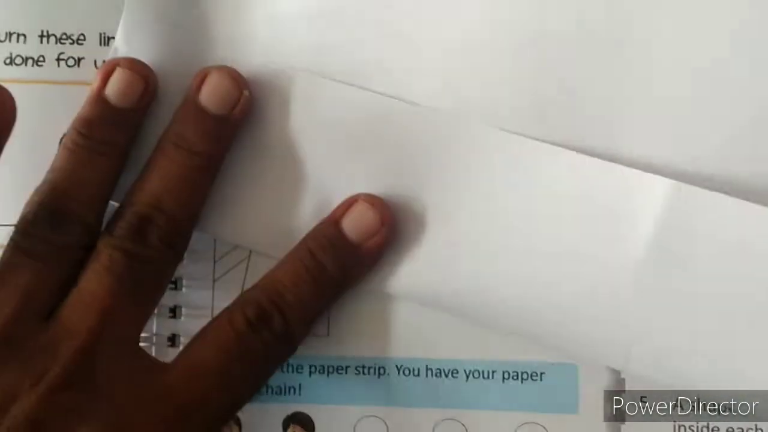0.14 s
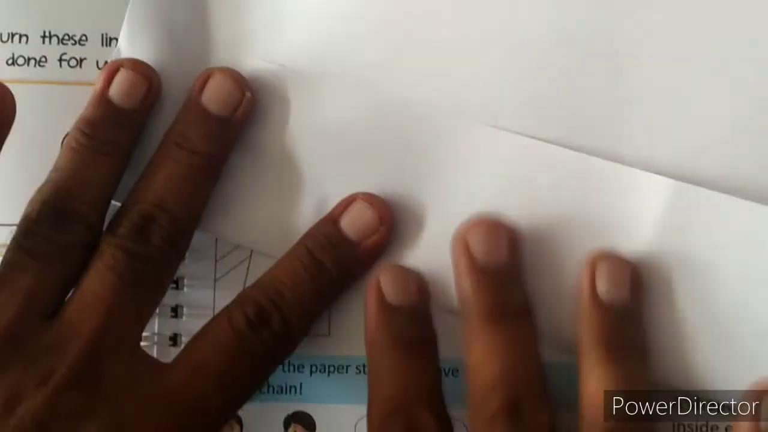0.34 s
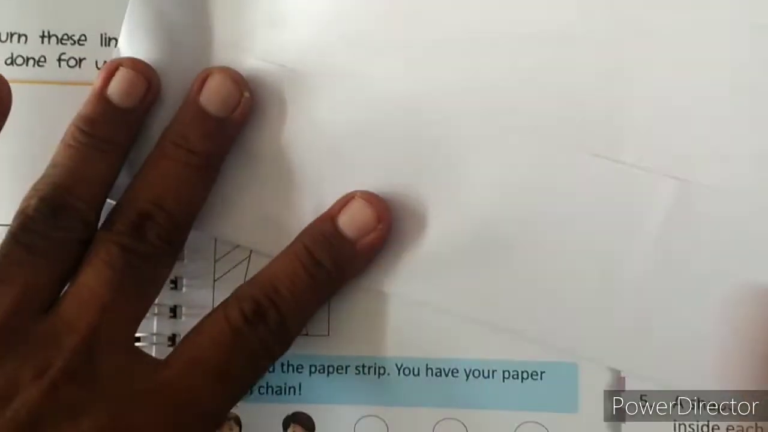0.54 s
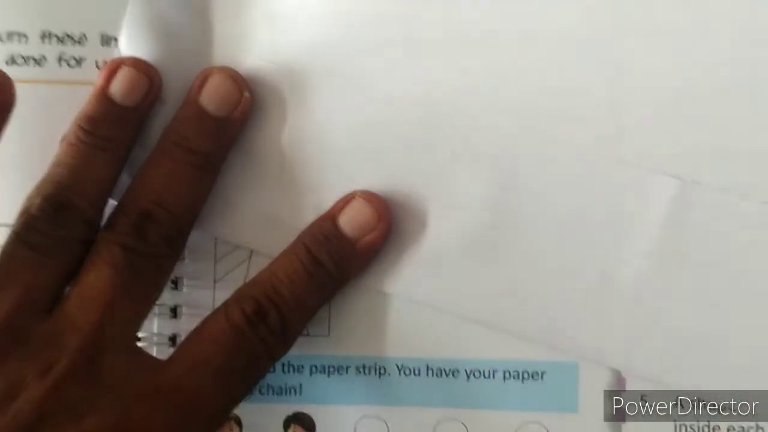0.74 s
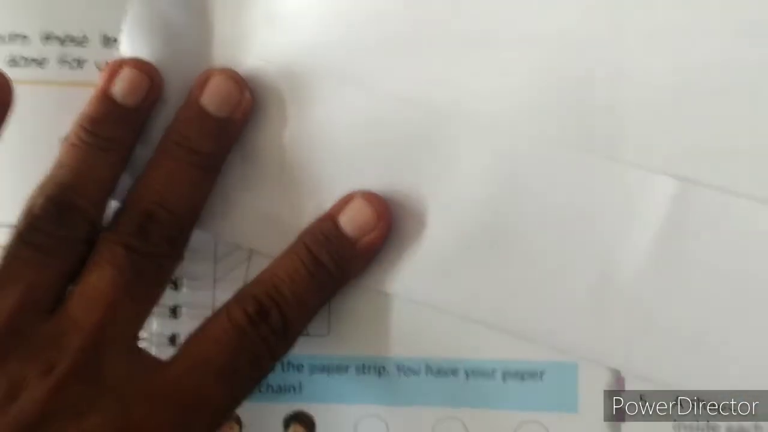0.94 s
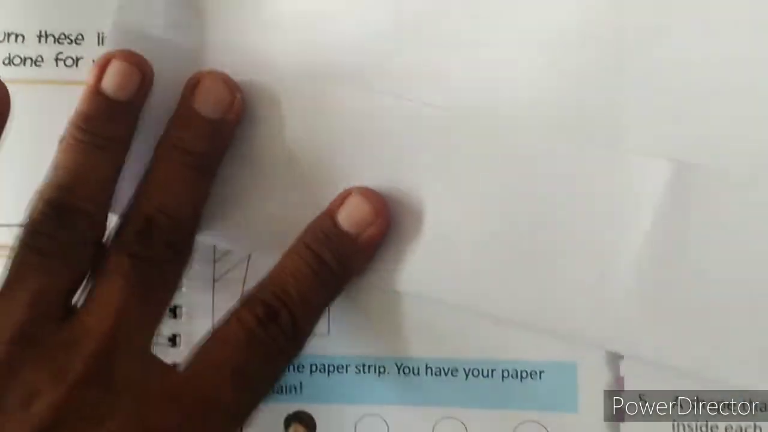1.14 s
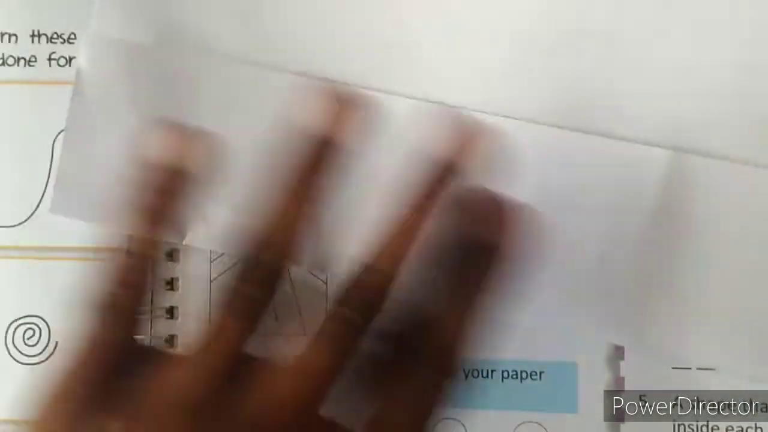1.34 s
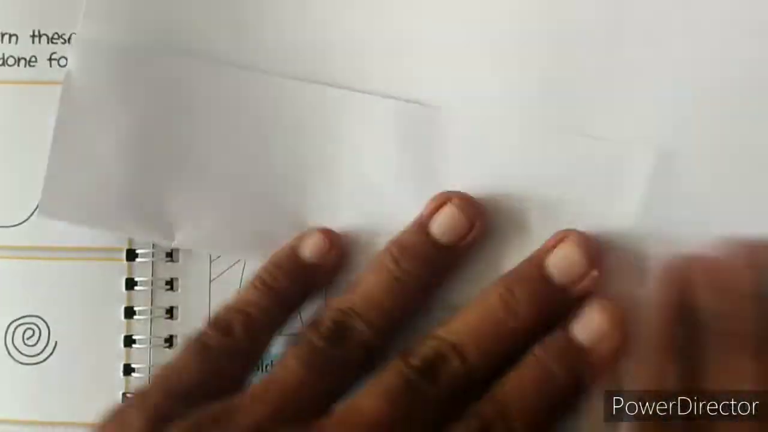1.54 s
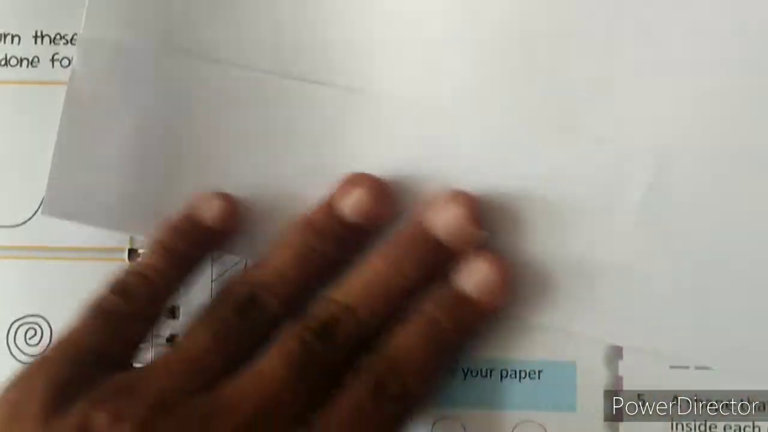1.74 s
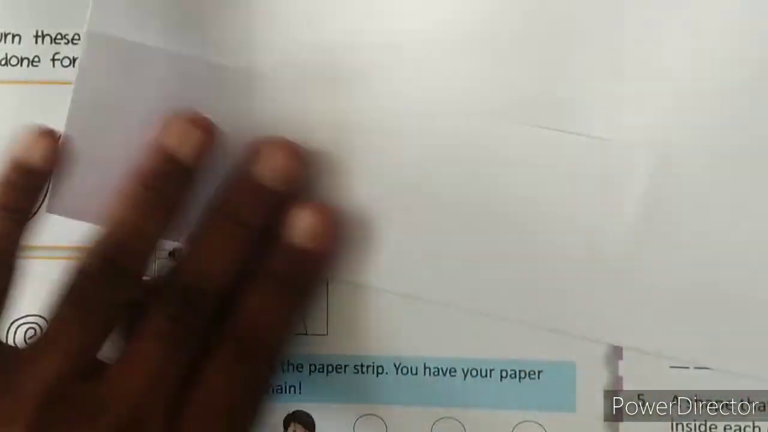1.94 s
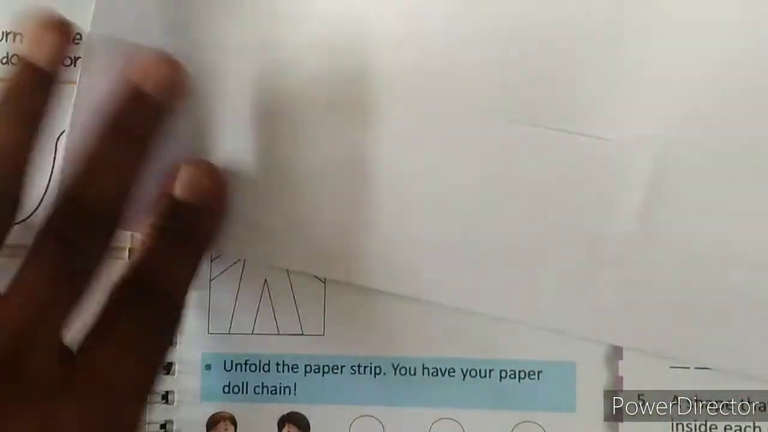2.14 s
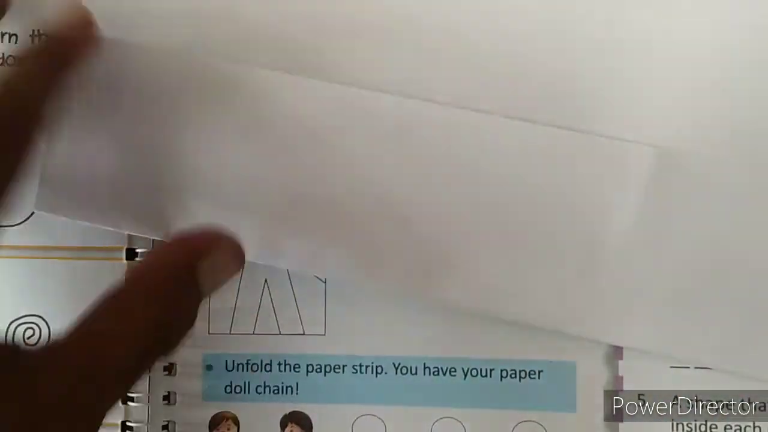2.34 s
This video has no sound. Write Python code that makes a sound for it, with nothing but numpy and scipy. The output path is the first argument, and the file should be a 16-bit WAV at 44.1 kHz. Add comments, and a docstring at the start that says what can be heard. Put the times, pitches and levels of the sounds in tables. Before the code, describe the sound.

Hands press and slide along folded paper on a desk, hissing, crackling and softly thumping indoors

```python
"""Fingertips smooth a paper strip on a desk under a phone on a stand. Skin slides on paper (a bright hiss) and
paper slides on paper (a duller scrape), both made of patchy noise, and the dragging rumbles in the desk.
Creases snap as short bursts of noise, and a small room answers them. Fingers tap the desk, whose low knock,
a sum of fading tones, climbs the stand into the left microphone. Soft room tone lies underneath."""
import sys
import numpy as np
from scipy import signal
from scipy.fft import rfft, irfft, next_fast_len
from scipy.io import wavfile
from scipy.ndimage import uniform_filter1d, map_coordinates

SR = 44100
rng = np.random.default_rng(int(sys.argv[2]) if len(sys.argv) > 2 else 0)


def master(y):
    """Save y as 16-bit WAV."""
    cut = np.clip(np.atleast_2d(y).T, -1, 1)
    pcm = np.round(cut * 32767)  # scale
    wavfile.write(sys.argv[1], SR, pcm.astype(np.int16))


N = 110250  # length in samples: 2.5 seconds

# Room tone. Each row: frequency in Hz, relative strength per Hz in dB.
AIR_COLOUR = [(20, -29), (42, -3), (60, 4), (120, 9.5), (300, 2), (1000, -32), (4000, -12.5), (14000, -29)]
AIR_DB, AIR_LEFT_DB = -61.5, 15.5  # level; left over right

# How long the room rings. Each row: frequency in Hz, time to fade by 60 dB in seconds.
ROOM_FADE = [(300, 0.13), (2000, 0.43), (10000, 0.22)]
ROOM_DB, ROOM_DELAY_S = -5.5, 0.0033

# Tones the desk rings with. Each row: frequency in Hz, left level in dB, right level in dB,
# time to fade by 60 dB in seconds.
DESK_MODES = [(154, -25, -43, 0.2), (229, -6, -42, 0.075), (187, -4, -29, 0.16), (239.5, -8.5, -39, 0.23),
              (275.3, -7.5, -28.5, 0.16), (269.3, -2, -38, 0.086), (306.8, 0.5, -31, 0.17),
              (339.7, -14, -37, 0.27), (417.2, -8, -23, 0.15), (447, -16.5, -47, 0.29),
              (511, -29.5, -16, 0.02), (600, -17, -23, 0.076), (688.6, -10.5, -48, 0.14),
              (748, -9, -17, 0.074), (1079, -5.5, -21, 0.018)]
SWELL_CYCLES = 0.06  # time constant of a mode's build-up
MODE_SCATTER_DB, DETUNE = 3.5, 0.015  # each landing favours other modes; a resting hand shifts them (share)
WAVER_CYCLES, WAVER_PER_S = 0.07, 30  # pressing hands blur the ring: size and speed of the phase drift
STAND_HZ, STAND_ORDER = 106.5, 4  # the stand holds back slower shaking

# Finger taps. Each row: start in seconds, strength of the push in dB, contact time in seconds.
FINGER_TAPS = [(0.2247, -22, 0.0015), (0.337, -28, 0.00099), (0.3553, -21.5, 0.0025),
               (0.493, -27.5, 0.0026), (0.661, -22.5, 0.0036), (0.6747, -24.5, 0.0025),
               (0.802, -16.5, 0.011), (0.8466, -16, 0.0018), (0.87, -21, 0.0073), (0.902, -35, 0.0022),
               (0.993, -33.5, 0.00097), (1.002, -6, 0.0098), (1.019, -27, 0.0043), (1.066, -15.5, 0.0015),
               (1.294, -18.5, 0.0024), (1.404, -27, 0.0018), (1.418, -20.5, 0.0037), (1.538, -23, 0.0036),
               (1.689, -26.5, 0.00077), (1.71, -28.5, 0.0017), (1.7293, -23.5, 0.0019),
               (1.7448, -32, 0.0011), (1.894, -40.5, 0.00058), (2.201, -37.5, 0.0012),
               (2.2141, -24.5, 0.0036)]

# Resonances of the paper on the desk, before the response is squared.
# Each row: frequency in Hz, width in Hz, level in dB.
PAPER_RESONANCES = [(474, 287, -3.5), (1018, 260, -1), (1353, 347, -2), (1889, 387, 0.5), (2192, 574, 1),
                    (2612, 663, -1.5), (3300, 870, -6), (4480, 1160, -6.5), (7850, 6400, -14)]

# Crease snaps. Each row: start in seconds, strength in dB before the paper rings, centre frequency in Hz,
# length in seconds, left over right in dB.
CREASE_SNAPS = [(0.0805, -27.5, 1490, 0.0062, -15), (0.179, -31, 2100, 0.0041, -9),
                (0.2165, -28, 1930, 0.0024, -8), (.476, -34, 2950, 0.00079, -23),
                (0.495, -28.5, 5000, 0.0017, -14), (0.5055, -9, 6500, 0.0016, -6),
                (0.517, -24.5, 8500, 0.0019, 12), (0.6917, -32, 3020, 0.016, -14),
                (.929, -35.5, 2600, 0.0015, -12), (1.105, -33.5, 3430, 0.019, -7),
                (1.125, -25, 2580, 0.0086, -12.5), (1.212, -40.5, 1880, 0.042, -18),
                (1.2656, -19.5, 8000, 0.009, -4), (1.2762, -22, 8000, 0.005, 0),
                (1.2687, -20.5, 1860, 0.02, -8.5), (1.634, -39.5, 2950, 0.019, -17),
                (1.651, -33, 3060, 0.0098, -12), (1.658, -28.5, 2880, 0.0096, -8),
                (1.6845, -14, 1570, 0.0051, -15), (1.6894, -19, 660, 0.0074, -9.5),
                (1.713, -32, 1500, 0.0051, 8), (1.72, -35, 1180, 0.0097, -18),
                (2.002, -25.5, 2540, 0.0053, -17.5), (2.0035, -24, 776, 0.0091, 0),
                (2.042, -36, 2500, 0.0096, 7), (2.0264, -29.5, 590, 0.0048, -15),
                (2.0269, -32, 2800, 0.012, 15), (2.167, -33.5, 2960, 0.0065, 2),
                (2.214, -25.5, 9000, 0.0015, -13), (2.234, -28, 10000, 0.0015, 2),
                (2.243, -26.5, 10000, 0.0047, -3), (2.45, -49.5, 1390, 0.004, -25)]
SNAP_WIDTH_OCT, SNAP_RISE_S = 1.02, 0.000081  # spread of the colour in octaves; time constant of the rise
SNAP_FLOOR_HZ = 350  # thin paper radiates little bass
CRACKS_PER_S, CRACK_SPREAD_DB = 1500, 2.5  # a snap is a run of tiny cracks
LEFT_LAG_S = 0.0004  # the left port is farther away
BARE_DB = -7.5  # the snap heard directly, next to the ringing paper

# Sliding over time. Each row: time in seconds, level of the skin hiss in dB, level of the paper scrape in dB,
# level of the desk rumble in dB.
SLIDE_LEVELS = [(0, -41, -58, -51), (.15, -41, -47, -61), (.19, -50.5, -47, -62),
                (0.247, -45, -51.5, -38.5), (.32, -58.5, -56, -54.5), (.46, -69, -62.5, -52),
                (0.5, -42, -43.5, -60), (.55, -43.5, -56.5, -50), (0.679, -39.5, -81, -63.5),
                (.78, -41, -64, -54), (0.842, -49, -58.5, -54), (0.953, -45, -54, -53),
                (1.06, -55, -60, -48), (1.098, -49, -66, -35.5), (1.137, -40, -45.5, -40.5),
                (1.2, -50.5, -45, -47), (1.259, -45, -44.5, -45), (1.297, -39, -41, -29.5),
                (1.35, -47.5, -43, -40.5), (1.42, -54.5, -45.5, -48.5), (1.612, -70, -56, -54),
                (1.645, -43, -47, -74), (1.679, -45.5, -46.5, -45), (1.7, -46.5, -32, -33),
                (1.752, -44.5, -38, -37), (1.8, -43.5, -41, -49), (1.99, -49.5, -46, -52),
                (2.03, -48.5, -43, -57), (2.19, -52, -51.5, -54), (2.24, -49.5, -50.5, -56.5),
                (2.321, -59, -54, -55.5), (2.391, -48.5, -56, -64), (2.5, -64, -59.5, -78.5)]
# Colour of skin on paper. Each row: frequency in Hz, relative strength per Hz in dB.
HISS_COLOUR = [(250, -73), (650, -9.5), (1200, -11.5), (2400, -6.5), (3500, -0.5), (4500, -0.5), (7000, -5),
               (9000, -0.5), (14500, -10.5)]
HISS_LEFT_DB, SCRAPE_LEFT_DB = -0.5, 2  # left over right
GRAINS_PER_S, GRAIN_SPREAD_DB = 540, 5  # fibres that catch and let go
GRAIN_SHARE = 0.14  # their share of the power

# Overall colour of the sound: a dip above 4.7 kHz, a steep drop above 14.3 kHz.
# Each row: frequency in Hz, gain in dB.
OVERALL_COLOUR = [(4500, -0.5), (5000, -6.5), (6500, -2), (8600, 0.5), (10500, -5), (14300, -5),
                  (14700, -37)]
TOP_HZ, EDGE_HZ = 15600, 300  # nothing above the top; the fade below it is this wide


def amp(db):
    """Turn dB into a plain gain."""
    return 10 ** (np.asarray(db) / 20)


def unit(x):
    """Scale each channel to an average (RMS) level of one."""
    return x / np.sqrt(np.mean(x ** 2, axis=-1, keepdims=True) + 1e-20)


def along(points, hz):
    """Read a curve of (Hz, value) points on a log frequency axis."""
    point_hz, values = np.transpose(points)
    return np.interp(np.log(hz + 1), np.log(point_hz + 1), values)


def filtered(x, response):
    """Multiply the spectrum of x by a response that depends on frequency."""
    size = next_fast_len(x.shape[-1] + SR // 2)
    spectrum = rfft(x, size) * response(np.fft.rfftfreq(size, 1 / SR))
    return irfft(spectrum, size)[..., :x.shape[-1]]


def sides(left_db):
    """Gains of both channels for a left-over-right difference."""
    return amp([[left_db / 2], [-left_db / 2]])


def room_tone():
    """Steady coloured noise, much stronger on the left."""
    noise = filtered(rng.standard_normal((2, N)), lambda hz: amp(along(AIR_COLOUR, hz)))
    return amp(AIR_DB) * sides(AIR_LEFT_DB) * unit(noise)


def room(x):
    """Each frequency of the room's answer dies at its own speed."""
    hz, t, z = signal.stft(rng.standard_normal((2, SR)), SR, nperseg=256)
    fade = amp(-60 * t / along(ROOM_FADE, hz)[:, None])
    tail = signal.istft(z * fade, SR, nperseg=256)[1]
    late = np.pad(x.mean(axis=0), (round(ROOM_DELAY_S * SR), 0))
    return signal.fftconvolve(late[None], tail / np.linalg.norm(tail[0]), axes=1)[:, :N]


def desk(push, scatter):
    """A push rings the desk's modes, which reach each port through the stand; scatter 0 keeps them as listed."""
    hz, left_db, right_db, t60 = np.transpose(DESK_MODES)[..., None]
    t = np.arange(SR // 2) / SR
    level_luck, pitch_luck = scatter * rng.standard_normal((2, *hz.shape))

    # a slow random phase for each mode, starting from zero
    drift_points = rng.standard_normal((len(hz), WAVER_PER_S))
    places = np.broadcast_arrays(np.arange(len(hz))[:, None], t * WAVER_PER_S)
    drift = map_coordinates(drift_points, places)
    waver = WAVER_CYCLES * (drift - drift[:, :1]) * np.minimum(t * WAVER_PER_S, 1)
    cycles = hz * (1 + DETUNE * pitch_luck) * t + waver

    fade = amp(MODE_SCATTER_DB * level_luck - 60 * t / t60)
    swell = 1 - np.exp(-hz * t / SWELL_CYCLES)
    rings = fade * swell * np.cos(2 * np.pi * cycles)
    answer = np.array([(amp(db) * rings).sum(axis=0) for db in (left_db, right_db)])
    stand = signal.butter(STAND_ORDER, STAND_HZ, "high", fs=SR, output="sos")
    return signal.fftconvolve(push[None], signal.sosfilt(stand, answer), axes=1)


def taps():
    """Each fingertip is a soft push on the desk; a longer contact knocks duller."""
    out, t = np.zeros((2, N + SR)), np.arange(SR // 50) / SR
    for start, db, contact in FINGER_TAPS:
        push = t ** 2 * np.exp(-6 * t / contact)
        knock = desk(amp(db) * push / push.sum(), scatter=1)
        out[:, round(start * SR):][:, :knock.shape[1]] += knock
    return out[:, :N]


def paper(hz):
    """Causal response of the paper's resonances, with shallow valleys between them."""
    total = 0
    for k, (centre, width, db) in enumerate(PAPER_RESONANCES):
        damping = 1j * hz * width
        # neighbours get opposite signs
        total = total + (-1) ** k * amp(db) * damping / (centre ** 2 - hz ** 2 + damping)
    return total ** 2


def snaps():
    """A crease gives way: a noise burst around its own centre that partly rings the paper."""
    out, t = np.zeros((2, N + SR)), np.arange(SR // 10) / SR
    for start, db, centre_hz, length, left_db in CREASE_SNAPS:
        def colour(hz):
            octaves = np.log2((hz + 1) / centre_hz)
            less_bass = hz ** 2 / (hz ** 2 + SNAP_FLOOR_HZ ** 2)
            return less_bass * np.exp(-0.5 * (octaves / SNAP_WIDTH_OCT) ** 2)

        wobble = map_coordinates(rng.standard_normal(SR // 10), [t * CRACKS_PER_S])
        cracks = amp(CRACK_SPREAD_DB * wobble) * rng.standard_normal((2, len(t)))
        fade = (1 - np.exp(-t / SNAP_RISE_S)) * np.exp(-2 * t / length)
        burst = unit(fade * filtered(cracks, colour))
        # scaling by the fade's own RMS keeps short and long snaps comparable in height
        burst *= np.sqrt(np.mean(fade ** 2)) * amp(db) * sides(left_db)
        out[0, round((start + LEFT_LAG_S) * SR):][:len(t)] += burst[0]
        out[1, round(start * SR):][:len(t)] += burst[1]
    return filtered(out[:, :N], lambda hz: amp(BARE_DB) + paper(hz))


def friction(colour, patchy_db):
    """Patchy noise plus tiny catches of the fibres: shared timing, but separate noise at the two ports."""
    # raise and lower patches of time and frequency at random
    z = signal.stft(rng.standard_normal((2, N)), nperseg=768)[2]
    field = uniform_filter1d(rng.standard_normal(z.shape[1:]), size=3, axis=0)
    field = uniform_filter1d(field, size=5, axis=1)
    noise = signal.istft(z * amp(patchy_db * field / field.std()), nperseg=768)[1][:, :N]

    strength = amp(GRAIN_SPREAD_DB * np.minimum(rng.exponential(size=N), 3))
    catches = (rng.random(N) < GRAINS_PER_S / SR) * strength
    decay = np.exp(-np.arange(SR // 500) / (SR * 0.00035))  # time constant of a catch: 0.35 milliseconds
    grains = np.convolve(catches, decay)[:N] * rng.standard_normal((2, N))
    mix = np.sqrt(1 - GRAIN_SHARE) * unit(noise) + np.sqrt(GRAIN_SHARE) * unit(grains)
    return unit(filtered(mix, colour))


def sliding():
    """Hiss and scrape in the air, and the rumble that dragging fingers send through the desk."""
    times, *levels = np.transpose(SLIDE_LEVELS)
    hiss, scrape, rumble = [amp(np.interp(np.arange(N) / SR, times, db)) for db in levels]
    skin = friction(lambda hz: amp(along(HISS_COLOUR, hz)), patchy_db=3.0)
    sheet = friction(paper, patchy_db=3.5)
    drag = np.gradient(uniform_filter1d(rng.standard_normal(N), size=40))
    shake = desk(drag, scatter=0)[:, :N]
    shake = shake / shake[0].std()  # the left side sets the level
    return hiss * sides(HISS_LEFT_DB) * skin + scrape * sides(SCRAPE_LEFT_DB) * sheet + rumble * shake


def scene():
    """Add up all layers; the room answers only the snaps."""
    cracks = snaps()
    return room_tone() + amp(ROOM_DB) * room(cracks) + taps() + cracks + sliding()


def record(dry):
    """Apply the overall colour and the upper limit of the sound."""
    def response(hz):
        edge = np.clip((TOP_HZ - hz) / EDGE_HZ, 0, 1) ** 2
        return amp(along(OVERALL_COLOUR, hz)) * edge

    return filtered(dry, response)


dry = scene()
out = record(dry)
master(out)
```